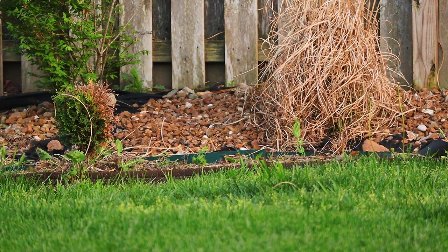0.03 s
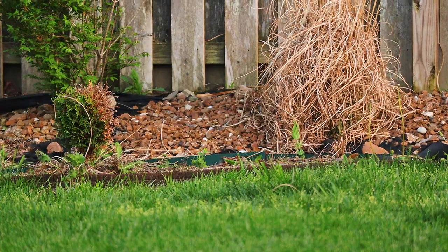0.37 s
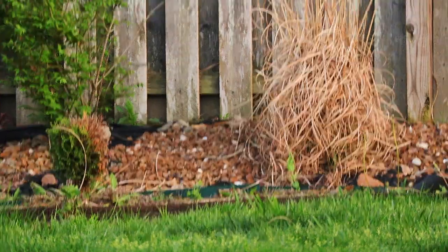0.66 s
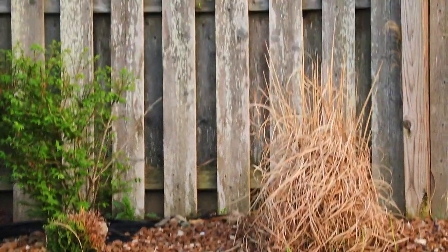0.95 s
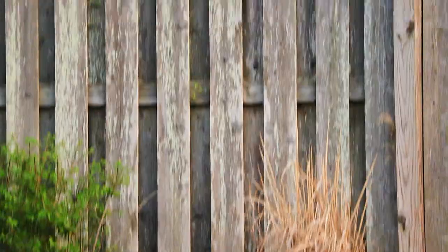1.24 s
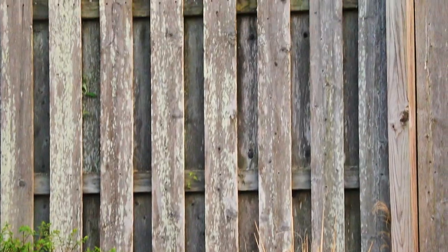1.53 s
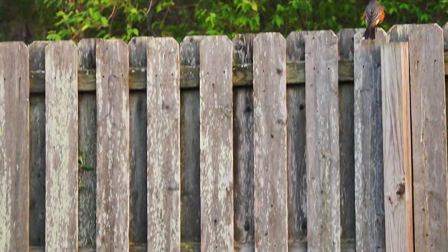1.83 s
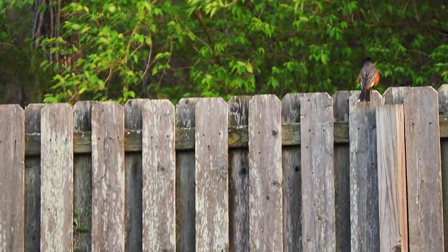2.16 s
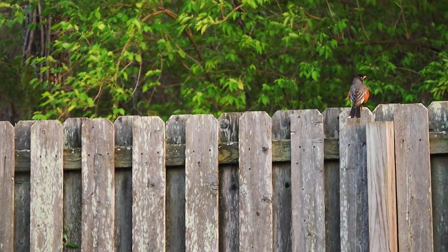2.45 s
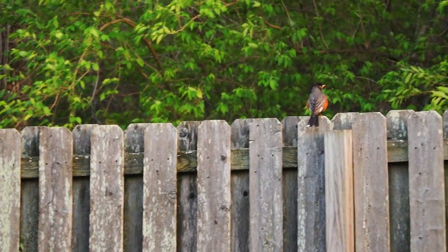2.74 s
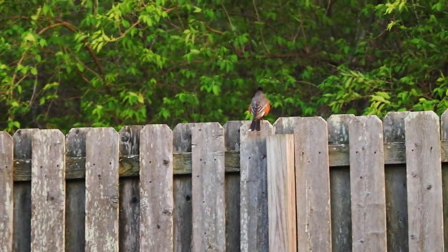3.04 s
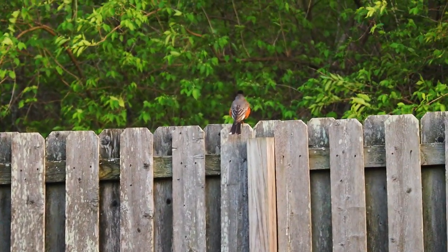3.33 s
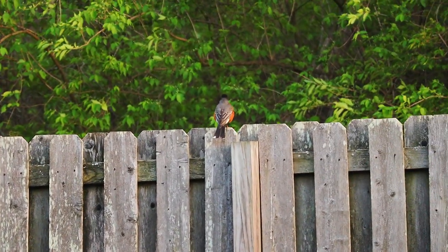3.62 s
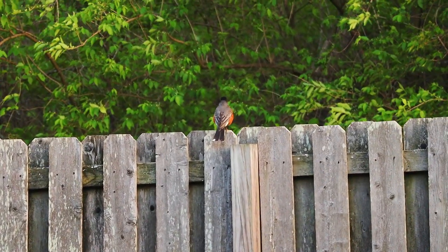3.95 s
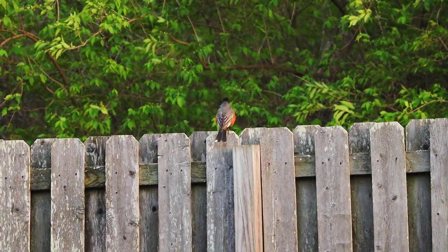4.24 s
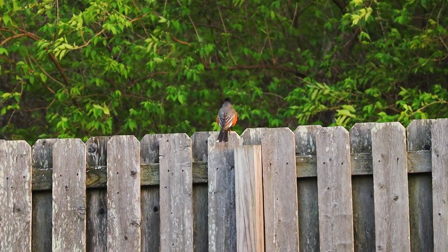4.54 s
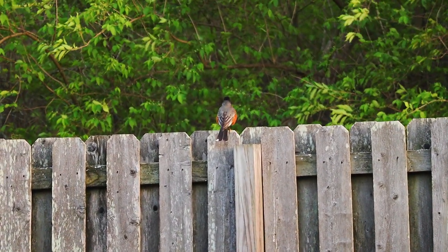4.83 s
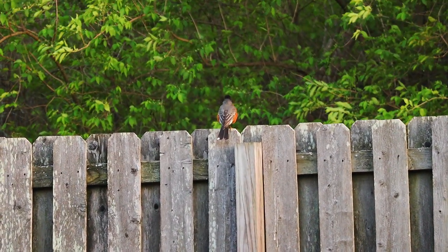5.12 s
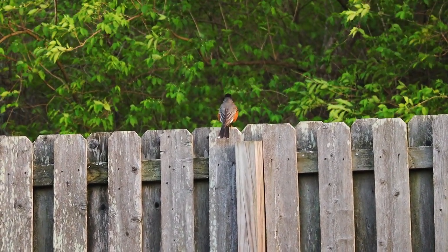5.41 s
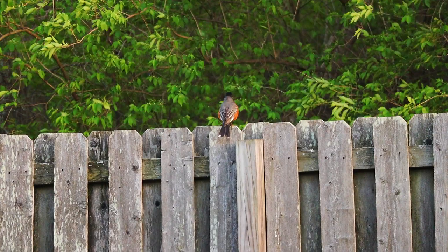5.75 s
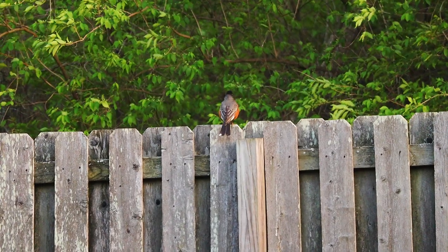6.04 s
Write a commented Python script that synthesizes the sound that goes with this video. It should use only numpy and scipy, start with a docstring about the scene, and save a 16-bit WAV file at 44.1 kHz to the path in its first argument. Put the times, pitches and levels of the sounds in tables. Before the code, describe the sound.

A soft outdoor hiss with low rumble and a faint hum of far-off machinery runs throughout. It opens with a slightly brighter rush, cut off before half a second, and a faint fading high ring. Three faint nasal bird calls follow from 0.7 to 1 second. A robin, close, centred and loud, then sings six short whistled phrases at about 1.1, 1.9, 2.9, 3.9, 4.9 and 5.7 seconds, each a quick cluster of rising and falling notes with a light garden echo. The first ends in a fast trill, the fourth and sixth in warbles. Between 2.8 and 4.5 seconds another songbird answers from trees on the right, quieter and much more reverberant. Distant birds on the left add thin whistles and peeps, mostly after 2 seconds, with faint falling chirps from 5.4 seconds until the end at about 6.3.

```python
"""A garden, with a robin on the fence singing six loud carolled phrases. The two sides of its syrinx
whistle separate arcs of pitch; one phrase ends in a fast trill, two in warbles. Another songbird
answers from the trees, much more reverberant, and distant birds add faint whistles, peeps, down-slurs
and nasal calls. Under it lies a bed of soft hiss, low rumble and far-off machinery, which opens with
a brief brighter rush and a fading high ring."""
import sys
import numpy as np
from scipy import signal
from scipy.fft import rfft, irfft
from scipy.io import wavfile
from scipy.ndimage import uniform_filter1d, minimum_filter1d

SR = 44100
rng = np.random.default_rng(int(sys.argv[2]) if len(sys.argv) > 2 else 0)


def master(y):
    """Save y as 16-bit WAV."""
    cut = np.clip(np.atleast_2d(y).T, -1, 1)
    pcm = np.round(cut * 32767)  # scale
    wavfile.write(sys.argv[1], SR, pcm.astype(np.int16))


N = 276948
TIME = np.arange(N) / SR
FREQS = np.fft.rfftfreq(N, 1 / SR)


def undb(db):
    """Decibels to gain."""
    return 10 ** (np.asarray(db) / 20)


def curve(rows):
    """An automation curve: (time_s, value) rows joined by straight lines."""
    return np.interp(TIME, *np.transpose(rows))


def colour(points):
    """An EQ curve: gain at every frequency from (freq_hz, level_db) points."""
    hz, db = np.transpose(points)
    return undb(np.interp(np.log(FREQS + 1), np.log(hz), db))


def noise(gain):
    """Noise of rms 1 with the given spectrum."""
    y = irfft(rfft(rng.standard_normal(N)) * gain, N)
    return y / y.std()


def flutter(hz):
    """Smooth random modulation of rms 1, up to about the given rate."""
    return noise(np.exp(-(FREQS / hz) ** 2))


def narrow_band(hz, width_hz):
    """Noise of rms 1 around one pitch: a wavering tone when the band is thin."""
    return noise(np.exp(-((FREQS - hz) / width_hz) ** 2))


def delay(x, seconds):
    """The sound a little later."""
    return np.interp(TIME - seconds, TIME, x, left=0)


def highpass(x, hz):
    """Only the treble of a sound."""
    return signal.sosfilt(signal.butter(4, hz, "high", fs=SR, output="sos"), x)


def garden_reverb(x, t60_s, early_db, early_s):
    """A quick dense scatter from fence and leaves, then a thin tail from trees and houses."""
    t = TIME[:SR * 3 // 2]
    decay = undb(-60 * t / t60_s) + undb(early_db) * np.exp(-t / early_s)
    onset = np.clip(t / 0.0045 - .5, 0, 1)
    response = rng.standard_normal(len(t)) * decay * onset
    return signal.fftconvolve(x, response / np.linalg.norm(response))[:N]


def arcs(rows, arch_db):
    """Notes as (time_s, pitch_hz, level_db) points: one bend each, the breath arch_db down at the ends."""
    u = np.linspace(-1, 1, 21)
    notes = []
    for start_s, length_s, start_hz, middle_hz, end_hz, level_db, swell_db in rows:
        times = start_s + length_s * (u + 1) / 2
        bow_hz = (start_hz + end_hz) / 2 - middle_hz
        pitch_hz = middle_hz + (end_hz - start_hz) / 2 * u + bow_hz * u ** 2
        breath_db = level_db + swell_db * u / 2 - arch_db * u ** 2
        notes.append(np.column_stack([times, pitch_hz, breath_db]))
    return notes


def glides(rows):
    """Plain notes that slide evenly from one pitch to another."""
    straight = [(s, length, start, (start + end) / 2, end, db, 0) for s, length, start, end, db in rows]
    return arcs(straight, arch_db=2)


def arches(rows):
    """Notes that rise to their pitch and level, then sink again."""
    return [[(s, .97 * hz, db - 4), (s + length / 2, hz, db), (s + length, .98 * hz, db - 5)]
            for s, length, hz, db in rows]


def syrinx(notes, edge_s, bend_hz):
    """Phase and envelope of a voice gliding through its notes, each opening and closing softly."""
    envelope = np.zeros(N)
    for note in notes:
        s, _, db = np.transpose(note)
        on = slice(*np.searchsorted(TIME, [s[0] - edge_s, s[-1] + edge_s]))
        gate = np.clip(np.minimum(TIME[on] - s[0], s[-1] - TIME[on]) / edge_s + .5, 0, 1)
        envelope[on] += np.sin(gate * np.pi / 2) ** 2 * undb(np.interp(TIME[on], s, db))
    pitch_hz = curve(np.concatenate(notes)[:, :2])
    # the syrinx muscles need about a millisecond to move
    pitch_hz, envelope = uniform_filter1d(uniform_filter1d([pitch_hz, envelope], size=55), size=55)
    return 2 * np.pi * np.cumsum(pitch_hz + bend_hz) / SR, envelope


def sing(notes, edge_s, bend_hz, overtone_db=None):
    """Near-pure bird tones, with optional weak overtones for a close bird."""
    # throat and beak pass low overtones and muffle high ones: freq_hz, gain_db
    beak = [(3000, -15.5), (3700, -12.5), (4200, -31.5), (4900, -44), (6500, -50), (7600, -60), (8700, -76),
            (10500, -45), (13000, -56), (14500, -51), (15600, -59.5)]
    voice = 0
    for part in (notes[::2], notes[1::2]):  # alternate notes run apart so that they may overlap
        phase, envelope = syrinx(part, edge_s, bend_hz)
        voice = voice + envelope * np.sin(phase)
        if overtone_db is not None:
            overtones = envelope * sum(np.sin(k * phase) * 2 / k for k in range(2, 6))
            overtones *= undb(overtone_db + 3 * flutter(150))
            voice = voice + irfft(rfft(overtones) * colour(beak), N)
    return voice


def outdoor_air():
    """The bed: steady rumble and machine drones under a soft hiss, slightly spread in stereo."""
    # tone of the open air: freq_hz, level_db
    air_spectrum = [(20, -12.5), (35, -2.5), (70, -5), (100, -2.5), (135, -4.5), (190, -13), (300, -15),
                    (600, -11.5), (1000, -2.5), (2000, -12), (3700, -17), (5400, -23), (8000, -25),
                    (15500, -27.5)]
    # its stereo width: freq_hz, side_minus_mid_db
    air_width = [(30, -24.5), (120, -13.5), (250, -7), (500, -8.5), (1000, -18.5), (4000, -10),
                 (12000, -25)]
    # the centre hiss dips briefly and later grows a little: time_s, gain_db
    hiss_ride = [(.425, -4), (.433, -18), (.511, -17), (.517, -1), (2.7, -1.5), (4.5, -0.5), (5.6, 0.5),
                 (6.28, 1.5)]
    # steady tones of distant machinery: pitch_hz, width_hz, level_db
    drones = [(91.5, 8.4, -66.5), (975, 14, -68.5)]
    air_gain = undb(-53)
    mid_eq = colour(air_spectrum)
    side_eq = mid_eq * colour(air_width)
    mid = air_gain * noise(mid_eq)
    side = air_gain * noise(side_eq) * np.linalg.norm(side_eq) / np.linalg.norm(mid_eq)
    mid += sum(undb(db) * narrow_band(hz, width) for hz, width, db in drones)
    rumble = irfft(rfft(mid) / (1 + (FREQS / 260) ** 4), N)
    hiss = (mid - rumble) * undb(curve(hiss_ride) + 0.23 * flutter(6.5))
    return rumble + hiss + np.outer([1, -1], side)


def opening_rush():
    """A brighter rush of noise that cuts off early, and a high ring that dies away."""
    # tone of the rush: freq_hz, level_db
    rush_spectrum = [(400, -22), (750, -6.5), (1300, -0.5), (2000, -11), (3000, -15), (4500, -20),
                     (5000, -31)]
    # its envelope: time_s, level_db
    rush_envelope = [(0, -49), (.425, -51), (.433, -100)]
    # the ringing band: pitch_hz, width_hz, level_db, t60_s
    ring_band = (4330, 290, -53, 1.05)
    pitch_hz, width_hz, level_db, t60_s = ring_band
    rush = noise(colour(rush_spectrum)) * undb(curve(rush_envelope))
    ring = narrow_band(pitch_hz, width_hz) * undb(level_db - 60 * TIME / t60_s)
    return rush + ring


def nasal_calls():
    """Faint scratchy calls from far off: only the second and a stronger third harmonic, plus dry ticks."""
    # arched calls: start_s, length_s, fundamental_hz, level_db
    calls = [(0.693, 0.081, 1833, -48.5), (0.831, 0.083, 1830, -50), (0.972, 0.091, 1834, -55.5)]
    phase, envelope = syrinx(arches(calls), edge_s=.012, bend_hz=35 * flutter(250))
    tone = (undb(-3) * np.sin(2 * phase) + np.sin(3 * phase)) * undb(5 * flutter(60) - 2)
    ticks = narrow_band(4400, 1900) * undb(5 * flutter(160) - 8)
    voice = envelope * (tone + ticks)
    return undb(-6) * voice + undb(-14) * garden_reverb(voice, t60_s=.5, early_db=3, early_s=.03)


def distant_birds():
    """Thin whistles, peeps and down-slurs to the left, half lost in their own echo."""
    # whistles and chips: start_s, length_s, start_hz, end_hz, level_db
    whistle_notes = [ (.773, .007, 5200, 3530, -55), (.913, .007, 4730, 3580, -58),
                     (2.435, 0.058, 3590, 3450, -49.5), (2.58, 0.072, 2540, 2597, -47),
                     (2.80, 0.037, 2532, 2690, -47), (3.22, 0.044, 2610, 2595, -48),
                     (3.685, 0.028, 3870, 3430, -46), (3.74, 0.054, 2910, 3253, -48),
                     (4.18, 0.018, 3740, 3490, -42), (4.235, .03, 3016, 3100, -42.5),
                     (4.612, 0.01, 3540, 3710, -38.5), (4.675, 0.036, 2910, 2970, -41),
                     (4.852, 0.017, 1899, 1930, -51.5), (5.34, 0.021, 1920, 2028, -44),
                     (5.58, 0.017, 1860, 1940, -44.5), (6.16, 0.021, 1930, 1970, -45.5), ]
    # faint high peeps: start_s, length_s, pitch_hz, level_db
    peep_notes = [(1.62, 0.072, 4200, -58), (2.12, 0.029, 4140, -45), (2.37, 0.045, 4220, -49),
                  (5.968, 0.026, 7090, -50.5), (6.035, 0.017, 7140, -54), (6.16, 0.03087, 7180, -61.5),
                  (6.235, 0.013, 7260, -59)]
    # one bird's repeated down-slur: start_s, level_db
    slur_cues = [(2.515, -61.5), (2.715, -64), (5.379, -47), (5.616, -48), (6.012, -44), (6.204, -45.5)]
    # the contour of each slur: offset_s, pitch_hz, gain_db
    slur_shape = [(0, 4100, -8), (.005, 3270, 6.5), (0.016, 2850, 1), (0.032, 2486, 12)]
    slur_notes = [np.array(slur_shape) + (start_s, 0, level_db) for start_s, level_db in slur_cues]
    whistles = sing(glides(whistle_notes), edge_s=0.0041, bend_hz=18 * flutter(100))
    peeps = sing(arches(peep_notes), edge_s=.006, bend_hz=60 * flutter(200))
    slurs = sing(slur_notes, edge_s=0.0023, bend_hz=50 * flutter(300))
    voices = undb(-0.5) * whistles + undb(2.5) * slurs + undb(-11) * peeps
    echo = garden_reverb(voices, t60_s=1.1, early_db=-1, early_s=.05)
    return np.outer(undb([2, -2.2]), voices + undb(-3.5) * echo)


def answering_bird():
    """Off to the right among the trees: it reaches the right ear first, wrapped in wide echoes."""
    # the reply: start_s, length_s, start_hz, middle_hz, end_hz, level_db, swell_db
    reply = [ (2.773, .045, 3530, 3470, 3557, -29, 18), (2.828, .030, 3534, 3440, 3445, -36, -4),
             (2.880, .046, 2700, 2745, 2736, -29.5, 18.5), (3.252, 0.012, 3980, 4030, 3950, -30.5, 10.5),
             (3.268, 0.02, 3850, 3707, 3578, -20.5, -8), (3.297, .044, 2683, 2720, 3600, -23.5, 13),
             (3.342, .014, 3670, 3150, 2870, -24, 8), (3.358, .038, 2880, 2780, 2720, -29, 6),
             (3.394, .020, 2613, 2352, 2290, -21.5, 4.5), (3.418, 0.051, 2260, 2324, 2400, -23.5, 9),
             (3.812, .026, 2742, 2740, 2750, -41.5, 12.5), (3.838, .028, 2940, 3150, 3113, -26, -5.5),
             (3.869, .034, 3670, 3520, 3114, -18.5, 9.5), (3.912, 0.027, 3557, 3350, 2700, -21.5, 4),
             (3.950, .040, 2760, 2750, 2960, -23, 3), (4.268, 0.028, 3330, 3550, 3720, -20, 1),
             (4.312, .052, 2720, 2720, 2950, -22, 3.5), (4.368, 0.091, 2398, 2520, 2690, -22, 5), ]
    voice = sing(arcs(reply, arch_db=0), edge_s=0.02, bend_hz=35 * flutter(160))
    voice *= undb(2 * flutter(64))
    direct = np.array([delay(voice, 0.000097), voice])
    mid = undb(-4.5) * garden_reverb(voice, t60_s=0.36, early_db=3, early_s=0.087)
    side = undb(1) * garden_reverb(voice, t60_s=0.64, early_db=15, early_s=0.036)
    return undb(1.5) * direct + np.array([mid + side, mid - side])


def trill_bend_hz():
    """The trill that ends the robin's first phrase: a fast pitch swing, uneven in depth and timing."""
    start_s, end_s, attack_s = 1.198, 1.335, .025
    rate_hz, swing_hz = 185, 180
    depth = np.clip((TIME - start_s) / attack_s, 0, 1) * (TIME < end_s)
    swing = np.sin(2 * np.pi * rate_hz * (TIME - start_s) + .35 * flutter(40))
    return swing_hz * depth * (undb(1.5 * flutter(90)) * swing + .12 * flutter(250))


def warbles(overtone_db):
    """The robin repeats one short sweep in quick runs that sink, narrow and fade."""
    # runs: start_s, spacing_s, first_hz, last_hz, first_sweep_hz, last_sweep_hz, level_db, fade_db
    runs = [ (4.066, 0.013, 2195, 2128, 280, 40, -8.5, -2),
            (5.754, .0135, 2551, 2306, -1200, -600, -7, -0.5), ]
    sweeps_per_run, duty = 5, 0.95
    sweeps = []
    for start_s, spacing_s, first_hz, last_hz, first_sweep, last_sweep, db, fade_db in runs:
        first, last = (first_hz, first_sweep, db), (last_hz, last_sweep, db + fade_db)
        for k, (hz, sweep_hz, level_db) in enumerate(np.linspace(first, last, sweeps_per_run)):
            pitches = hz - sweep_hz / 2, hz, hz + sweep_hz / 2
            sweeps.append((start_s + k * spacing_s, duty * spacing_s, *pitches, level_db, 0))
    notes = arcs(sweeps, arch_db=9.5)
    return sing(notes, edge_s=0.009, bend_hz=30 * flutter(330), overtone_db=overtone_db)


def glassy_shimmer(voice):
    """A faint aliasing-like shimmer far above each loud note: ring modulation by three high tones."""
    carriers = sum(undb(db) * np.cos(2 * np.pi * hz * TIME)
                   for hz, db in [(4000, -43), (8000, -52), (12000, -72.5)])
    return highpass(voice * carriers * undb(4.2 * flutter(40)), hz=4930)


def breath_rasp(voice):
    """Turbulent air hisses along with the tone, coming and going."""
    gusts = undb(2.5 * flutter(90))
    eq = colour([(300, -10), (1500, 9), (4000, 5), (7000, 0), (8500, -39), (11000, -18), (15000, -15.5)])
    return undb(-45) * np.abs(voice) * gusts * noise(eq)


def robin():
    """Two voices of one syrinx, close and central; a light garden echo and a shimmer are laid on top."""
    # the main voice: start_s, length_s, start_hz, middle_hz, end_hz, level_db, swell_db
    song = [ (1.066, .048, 2786, 2757, 2290, -6.5, 13), (1.121, .081, 2865, 2451, 2210, -6, -10.5),
            (1.201, .127, 2230, 2610, 2730, -6, 0), (1.904, 0.017, 1730, 1789, 2000, -28, 12),
            (1.919, .008, 2750, 2603, 2799, -11.5, -6), (1.932, .014, 1750, 1791, 2056, -25.5, 32.5),
            (1.947, 0.0065, 2500, 2780, 2550, 4.5, 0), (1.953, 0.046, 2500, 3328, 2611, -5.5, 11.5),
            (2.002, 0.0089, 2700, 2760, 2840, -11, -14), (2.930, 0.0075, 1650, 1922, 2529, -22, 30.5),
            (2.941, 0.0055, 2706, 2820, 2855, -7.5, -3), (2.952, 0.01263, 2884, 2933, 3040, -7, 0.5),
            (2.964, 0.024, 2700, 2175, 2023, -10.5, -16.5), (2.983, 0.0087, 3080, 3120, 3676, -5, 4.5),
            (2.996, 0.037, 2300, 2224, 2080, -14, -14.5), (3.928, .027, 3194, 2642, 2838, -4, 6.5),
            (3.955, 0.011, 2900, 2957, 2636, -2.5, -7.5), (3.976, 0.05, 2040, 2095, 1892, -9.5, -2),
            (4.028, 0.0088, 1720, 1900, 2288, -15, 13.5), (4.037, 0.025, 2220, 2302, 2386, -6.5, 0.5),
            (4.136, 0.012, 2100, 2073, 2044, -15.5, -5.5), (4.906, 0.019, 2760, 2832, 3450, -6.5, 13.5),
            (4.925, 0.017, 3100, 2907, 2868, -3.5, 3.5), (4.941, .008, 2700, 2200, 1980, -17.5, -8.5),
            (4.949, 0.019, 1930, 1991, 2200, -17.5, 20.5), (4.969, .024, 2250, 2368, 2440, -5.5, -1),
            (4.993, 0.021, 2600, 2840, 2880, -2, -3), (5.022, .022, 2880, 2914, 2830, -3.5, 2),
            (5.056, .017, 2830, 2860, 2850, -4.2, 0), (5.697, .019, 2800, 2784, 2060, -6.5, -1.5),
            (5.718, 0.021, 2900, 3510, 3923, -8, -4.5), (5.736, 0.021, 2735, 3015, 3133, -2, -9),
            (5.824, .044, 2080, 1974, 1817, -16.5, -9.5), ]
    # side tones, mostly from the other side of the syrinx: same columns as song
    side_tones = [ (1.159, 0.018, 3150, 3680, 3050, -25, 0), (1.932, 0.016, 3260, 3300, 4230, -14, -14.5),
                  (2.941, 0.027, 1480, 1500, 1570, -28.5, -6), (2.967, 0.015, 4490, 4300, 4070, -25.5, 12),
                  (2.993, .016, 4730, 4684, 5010, -24, -5), (3.009, 0.016, 4700, 3630, 2704, -21.5, 16),
                  (4.030, 0.04, 3820, 3680, 3470, -32.5, -2.5), (4.899, 0.012, 3398, 3590, 3557, -20, 2),
                  (4.940, 0.023, 3462, 3640, 3500, -16.5, -5), (4.968, 0.032, 3630, 3770, 3560, -21.5, 4.5),
                  (5.004, 0.019, 3508, 3740, 3384, -17, 13), (5.037, 0.025, 3576, 3660, 3395, -12.5, -1),
                  (5.675, 0.022, 3290, 3430, 3220, -17.5, 8.5), ]
    # brightness, phrase by phrase: level of the overtones, the rasp and a faint glassy shimmer
    # above loud notes: time_s, gain_db
    brightness = [(1.2, 0.5), (1.95, 3.5), (2.97, 10), (4.05, -0.5), (5, 1), (5.75, 2.5)]
    brightness_db = curve(brightness)
    trill_hz = trill_bend_hz()
    main = sing(arcs(song, arch_db=3.5), edge_s=0.0086,
                bend_hz=trill_hz + 12 * flutter(390), overtone_db=brightness_db - 1)
    main *= undb(-.007 * trill_hz)  # each upward swing of the trill is a little weaker
    main += warbles(overtone_db=brightness_db - 1.5)
    second = sing(arcs(side_tones, arch_db=3.5), edge_s=0.0015,
                  bend_hz=35 * flutter(430), overtone_db=brightness_db + 10)
    voice = (undb(-0.55) * main + undb(-2) * second) * undb(0.15 * flutter(420))
    # the two sides of the syrinx shake each other and add a sum tone
    sum_tone = undb(-25) * highpass(main * second, hz=5800)
    texture = undb(brightness_db) * (glassy_shimmer(voice) + breath_rasp(voice))
    echo = garden_reverb(voice, t60_s=1.246, early_db=26, early_s=0.012)
    # a house front throws part of the call back a little later
    slapback = delay(garden_reverb(voice, t60_s=0.51, early_db=1.5, early_s=0.06), seconds=.11)
    return voice + sum_tone + texture + undb(-11) * (echo + undb(-17.5) * slapback)


def scene():
    """All the birds over the garden air."""
    return robin() + answering_bird() + distant_birds() + nasal_calls() + outdoor_air() + opening_rush()


def record(dry):
    """A fast limiter holds the loudest notes down; a steep low-pass trims the top."""
    ceiling_db, top_hz = -1.8, 15800
    peak = np.abs(dry).max(axis=0)
    needed_gain = undb(ceiling_db) / np.maximum(peak, undb(ceiling_db))
    held_gain = minimum_filter1d(needed_gain, size=129)
    gain = uniform_filter1d(uniform_filter1d(held_gain, size=65), size=65)
    return signal.sosfilt(signal.ellip(8, .2, 70, top_hz, fs=SR, output="sos"), dry * gain)


dry = scene()
out = record(dry)
master(out)
```